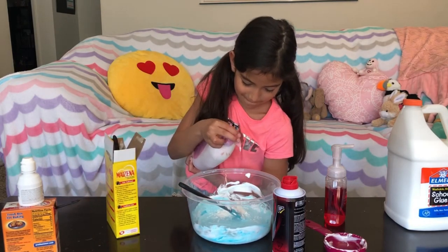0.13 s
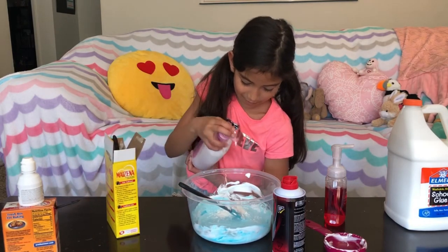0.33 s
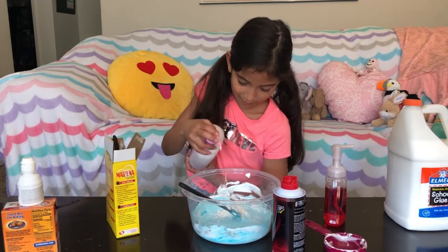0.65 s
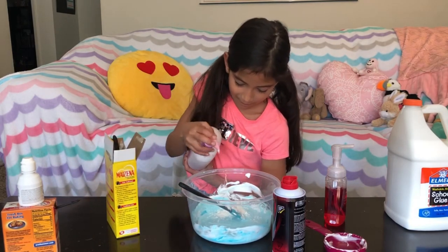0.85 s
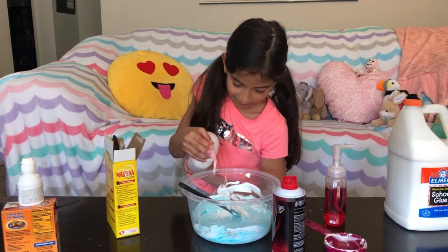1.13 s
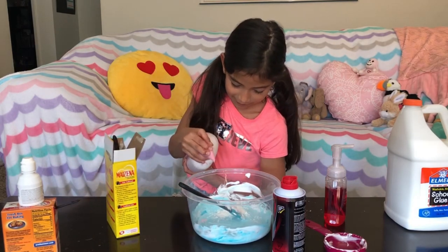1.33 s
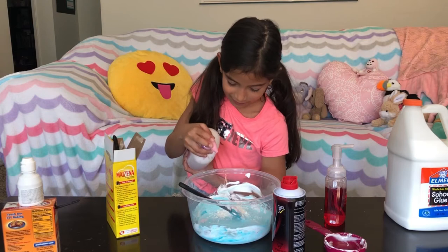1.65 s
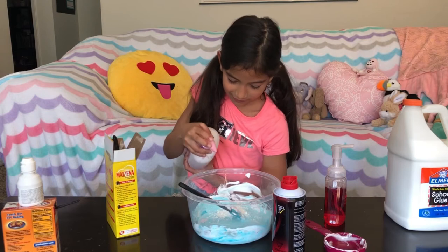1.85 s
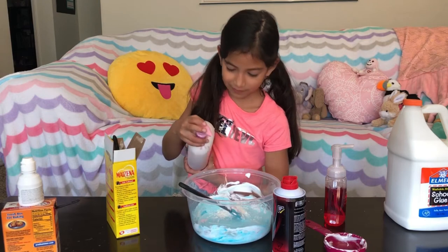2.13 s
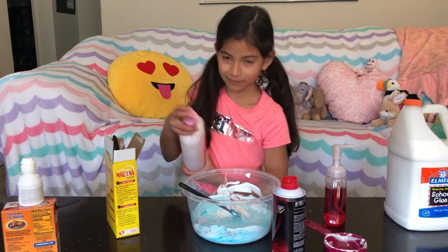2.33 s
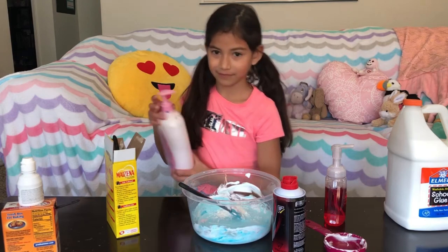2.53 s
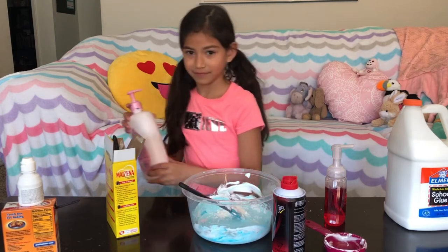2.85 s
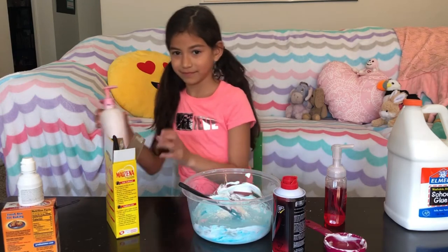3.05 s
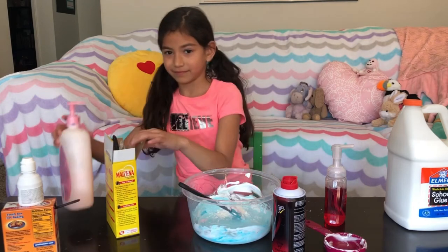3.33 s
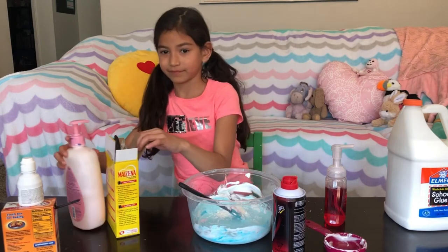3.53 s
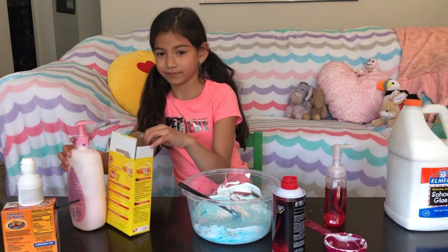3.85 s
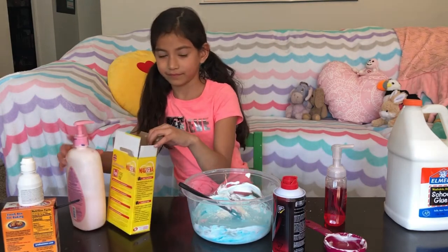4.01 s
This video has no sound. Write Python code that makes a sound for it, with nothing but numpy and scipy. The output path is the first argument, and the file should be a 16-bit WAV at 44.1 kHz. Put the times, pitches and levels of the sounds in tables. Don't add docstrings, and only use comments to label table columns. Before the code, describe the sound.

Fingers tick on a plastic pump bottle, its pump head snaps twice, then the bottle knocks down onto a wooden table and settles.

```python
import sys
import numpy as np
from scipy import signal
from scipy.fft import rfft, irfft, next_fast_len
from scipy.io import wavfile
from scipy.ndimage import uniform_filter1d, minimum_filter1d

SR = 44100
rng = np.random.default_rng(int(sys.argv[2]) if len(sys.argv) > 2 else 0)


def voltage_ratio(level):
    return 10 ** (np.asarray(level, float) / 20)


def bounce(signal):
    frames = np.transpose(np.atleast_2d(signal))
    limited = np.clip(frames, -1, 1)
    pcm = np.round(limited * 32767).astype(np.int16)
    wavfile.write(sys.argv[1], SR, pcm)


N = 184286


def rms_one(x):
    return x / np.sqrt(np.mean(x ** 2) + 1e-20)


def at_hz(points, hz, column=1):
    points = np.array(points)
    return np.interp(np.log(hz), np.log(points[:, 0]), points[:, column])


def in_time(rows, column):
    rows = np.array(rows)
    return np.interp(np.arange(N) / SR, rows[:, 0], rows[:, column])


def shaped(x, spectrum):
    hz = np.arange(len(x) // 2 + 1) * SR / len(x) + 1
    return irfft(rfft(x) * voltage_ratio(at_hz(spectrum, hz)), len(x))


def band(x, low_hz, high_hz):
    sos = signal.butter(2, [low_hz, min(high_hz, 0.45 * SR)], "band", fs=SR, output="sos")
    return signal.sosfilt(sos, x)


def above(x, hz):
    return signal.sosfilt(signal.butter(4, hz, "high", fs=SR, output="sos"), x)


def add(track, s, piece):
    i = round(s * SR)
    track[i:i + len(piece)] += piece[:N - i]


def push(ms):
    phase = np.clip(np.arange(0.5, 400) / (ms * SR / 1000), 0, 1)
    hump = np.sin(np.pi * phase) ** 2
    return hump / hump.sum()


def burst(ms):
    t_ms = np.arange(1500) / SR * 1000
    envelope = (1 - np.exp(-t_ms / 0.081)) * np.exp(-t_ms / max(ms, 0.2))
    return rng.standard_normal(len(t_ms)) * envelope


def ring(force, modes, flip=-1, blur=1):
    out = 0
    for k, (hz, level_db, t60) in enumerate(modes):
        r = voltage_ratio(-60 * blur / (t60 * SR))
        w = 2 * np.pi * hz / SR
        gain = flip ** k * voltage_ratio(level_db) * np.sin(w) * np.sqrt(blur)
        out = out + signal.lfilter([0, gain], [1, -2 * r * np.cos(w), r * r], force + 1e-18)
    return out


def all_directions(force, modes):
    unit = np.arange(2048) == 0
    power = sum(np.abs(rfft(ring(unit, [mode], blur=1.6))) ** 2 for mode in modes)
    response = np.roll(irfft(np.sqrt(power)), 1024)
    return signal.fftconvolve(force, response, "same")


def late_lows(x, ms):
    size = next_fast_len(N + SR // 4)
    hz = np.arange(size // 2 + 1) * SR / size
    turn = np.exp(-2j * np.pi * ms * np.log(1 + hz / 150))
    return irfft(rfft(x, size) * turn, size)[:N]


def snaps():
    # start in [s], peak in [dB].
    first_snap = [
        (1.1833, -18),
    ]
    second_snap = [
        (1.6633, -25),
        (1.6671, -18),
    ]
    # frequency in [Hz], level in [dB], T60 in [s].
    head_down = [(3000, -27, 0.0047), (4000, 7, 0.0018), (5240, 5, 0.0044), (5220, 11.5, 0.00088),
                 (7320, 8, 0.0026), (8700, -21, .003), (10100, -43, .003), (11400, 6.5, 0.0005),
                 (13060, -11, 0.0044), (14700, -2, 0.00089)]
    head_up = [(3620, 4.5, 0.0069), (4200, 1, 0.0066), (4960, 2, 0.0039), (5740, -7.5, 0.009),
               (7070, 0.5, 0.0068), (9250, -4, 0.0035), (10300, -2, 0.0031), (12300, -13, 0.0026),
               (13700, -12, 0.0023)]
    heard, all_round = 0, 0
    for hits, head, cut_hz in ((first_snap, head_down, 2800), (second_snap, head_up, 3400)):
        click, chatter = np.zeros(N), np.zeros(N)
        for s, db in hits:
            add(click, s, voltage_ratio(db + 3.5) * push(0.0385))
            add(chatter, s, voltage_ratio(db - 16.5) * burst(1.36))
        ringing = above(above(ring(click + chatter, head), cut_hz), cut_hz)
        heard = heard + ringing + voltage_ratio(5) * band(click, 1200, 3500)
        all_round = all_round + above(above(voltage_ratio(-3) * all_directions(click, head), cut_hz), cut_hz)
    return np.array([heard, all_round])


def knocks():
    # start in [s], push in [dB], crack in [dB], contact in [ms].
    contacts = [(3.5803, -20.5, -26.5, 1.05), (3.5835, -36, -55, 1.8), (3.5997, -38, -37.5, 0.79),
                (3.603, -49, -41, 1.6), (3.666, -62, -55, 2.9), (3.706, -38, -62, 1.6),
                (3.808, -41.5, -54.5, 2.18), (3.849, -40, -62, 3.4), (3.999, -48, -64.5, 2.05),
                (4.019, -43, -74, 5.8), (4.093, -42.5, -55, 1.43), (4.137, -31, -51, 2.03),
                (4.156, -32, -54, 4.1)]
    # frequency in [Hz], level in [dB], T60 in [s].
    table_modes = [(108.6, -5.5, 0.32), (157.5, -6.5, .25), (211, 2.5, 0.072), (261.5, -9.5, 0.13),
                   (284, -4.5, 0.22), (313.3, -2, 0.194), (373, -5.5, 0.14), (439, -7.5, 0.1),
                   (495, -2.5, 0.1), (538, -7, 0.05), (596.6, 4, 0.089), (647, 7.5, 0.046),
                   (733, -16, 0.48), (792, -3, 0.13), (878, -0.5, 0.16), (934, -6, 0.13), (1020, -10, 0.22),
                   (1130, 0, 0.18), (1243, 3, 0.14), (1920, -12, 0.13)]
    rim_modes = [(1670, 11, 0.0019), (2130, 12.5, 0.0028), (2880, 13.5, 0.0013), (4050, -53, 0.012),
                 (4900, -30, 0.0023), (7500, -47, 0.0029), (9600, -48, 0.0015)]
    force, cracks, clicks = np.zeros(N), np.zeros(N), np.zeros(N)
    for s, push_db, crack_db, ms in contacts:
        add(force, s, -voltage_ratio(push_db) * push(np.clip(ms, 0.2, 8)))
        add(cracks, s, voltage_ratio(crack_db - 9) * burst(4.1))
        add(clicks, s, voltage_ratio(crack_db + 4) * push(0.027))
    table = above(ring(late_lows(force, 1.208), table_modes, flip=0.94), 154)
    rim = np.array([ring(cracks, rim_modes), all_directions(clicks, rim_modes)])
    return table + band(rim, 450, 7400)


def ticks():
    # start in [s], peak in [dB], ring in [Hz], hollow thump in [dB].
    crisp_ticks = [
        (0.152, -33.5, 2920, -47),
        (1.1099, -47, 4400, -57),
        (1.634, -35, 4700, -43.5),
        (2.2954, -61.5, 3190, -72),
        (3.455, -59, 3200, -57),
        (3.483, -60, 4140, -57),
        (3.8888, -56, 2820, -59),
        (4.0804, -46.5, 2980, -51),
        (4.093, -51, 3800, -45.5),
    ]
    dull_ticks = [(0.2688, -64, 2620, -61), (0.407, -47.5, 2950, -85), (0.4528, -52, 3050, -56.5),
                  (0.5136, -55, 3850, -60.5), (0.818, -60.5, 2540, -79), (1.061, -37.5, 4120, -41),
                  (1.0882, -55, 3820, -68), (1.6289, -36.5, 4070, -44.5), (2.2122, -54.5, 4730, -78),
                  (2.8913, -53.5, 2960, -84), (2.93, -60, 4740, -62), (2.969, -52, 3800, -73),
                  (3.2343, -57, 3740, -64), (3.8298, -44.5, 2920, -50), (3.9096, -47, 2450, -71.5),
                  (3.915, -51.5, 2430, -58)]
    # start in [s], peak in [dB].
    thumb = [
        (0.408, -50),
        (0.972, -60.5),
        (1.166, -41),
        (1.172, -69),
        (1.184, -44.5),
        (1.668, -39),
    ]
    # frequency in [Hz], level in [dB], T60 in [s].
    bottle_modes = [(318, 1.5, 0.019), (409, 1, 0.031), (540, 2.5, 0.012), (760, -6, 0.029),
                    (918, -2, 0.026), (1233, 1.5, 0.014), (1507, 1.5, 0.01), (2195, -3, 0.021)]
    spout_modes = [(2480, -49, .04), (2610, -49, 0.04)]
    out, thumps, spout = np.zeros((2, N)), np.zeros(N), np.zeros(N)
    for rows, treble_db in ((crisp_ticks, 0.5), (dull_ticks, -23)):
        for s, db, hz, thump_db in rows:
            heard_force = 0.5 * burst(1) + 2.45 * np.pad(push(0.068), (0, 1100))
            all_round_force = 3.4 * push(0.065)
            for track, force in zip(out, (heard_force, all_round_force)):
                pitch = band(force, hz / 1.365, hz * 1.405)
                treble = voltage_ratio(treble_db - 9) * band(force, hz * 1.85, 12300)
                add(track, s + 0.00042, voltage_ratio(db + 16.5) * (pitch - treble))
            add(thumps, s, voltage_ratio(thump_db) * push(0.14))
    for s, db in thumb:
        add(thumps, s, voltage_ratio(db - 1) * push(0.39))
    add(spout, crisp_ticks[0][0] + 0.0027, burst(27) / 9)
    body = above(ring(late_lows(thumps, 1.48), bottle_modes), 240)
    return out + body + ring(spout, spout_modes) * [[1], [0.3]]


def rubbing():
    # start in [s], length in [s], level at start in [dB], level at end in [dB], centre at end in [Hz].
    strokes = [(0.106, 0.092, -67.5, -71, 4900), (0.431, .04, -61.5, -70, 4360),
               (0.75, 0.056, -70.5, -66, 4260), (0.99, .03, -70, -79, 4500), (1.078, 0.026, -80, -75, 5500),
               (2.478, 0.22, -61.5, -57.5, 6900), (2.905, 0.068, -63, -62, 4530),
               (3.217, 0.013, -69.5, -66.5, 4000), (3.365, .13, -75, -72, 4470),
               (3.791, 0.11, -59.5, -65.5, 4000), (4.102, 0.024, -64, -73, 4370),
               (4.144, 0.033, -71, -57, 1700)]
    start_hz, rise_db_per_s, fall_db_per_s = 4700, 178, 214
    t, level, centre = np.arange(N) / SR, np.full(N, 1e-9), np.zeros(N)
    for s, length, start_db, end_db, end_hz in strokes:
        along = np.clip((t - s) / max(length, 0.005), 0, 1)
        edges_db = rise_db_per_s * np.maximum(s - t, 0) + fall_db_per_s * np.maximum(t - s - length, 0)
        stroke = voltage_ratio(start_db + (end_db - start_db) * along - edges_db)
        level = level + stroke
        centre = centre + stroke * (start_hz + (end_hz - start_hz) * along)
    centre = (centre + 1e-9 * start_hz) / level
    out, edges = 0, np.geomspace(620, 15500, 12)
    for low, high in zip(edges, edges[1:]):
        patches = rms_one(band(rng.standard_normal(N), 0.67, 23))
        grains = rng.standard_normal(N) * voltage_ratio(2 * rng.exponential(1, N) + 1.8 * patches)
        octaves_off = np.log2(np.sqrt(low * high) / centre)
        colour_db = -4.5 * octaves_off ** 2 - 7.1 * (low / 11000) ** 2
        out = out + voltage_ratio(colour_db) * band(grains, low, high)
    return level * out / np.sqrt(uniform_filter1d(out ** 2, 4000))


def stirring():
    # time in [s], level in [dB].
    bumps = [
        (0.0, -61),
        (0.85, -59),
        (1.13, -58.5),
        (1.29, -62.5),
        (2.06, -64.5),
        (2.16, -62.5),
        (3.42, -60.5),
        (3.56, -57.5),
    ]
    lumps = rms_one(band(rng.standard_normal(N), 1, 28))
    rumble = rms_one(band(rng.standard_normal(N), 100, 468))
    return voltage_ratio(in_time(bumps, column=1) - 4.5 + 3.2 * lumps) * rumble


def house_air():
    # frequency in [Hz], level in [dB].
    air_spectrum = [(13, -67), (22, -13.5), (76, 1), (179, -6.5), (223, -1.5), (263, -5), (409, -14.5),
                    (554, -24), (602, -12.5), (815, -13), (935, -15.5), (1020, -13.5), (3320, -20),
                    (4890, -19.5), (16000, -29)]
    return voltage_ratio(-58.5 - 5) * rms_one(shaped(rng.standard_normal(N), air_spectrum))


def echoes(x):
    # delay in [ms], level in [dB], smear in [ms].
    surfaces = [
        (1.45, -8, .3),
        (7.7, -18, .7),
        (12.6, -14, .6),
    ]
    response = np.zeros(SR // 10)
    for ms, db, smear_ms in surfaces:
        scatter = burst(smear_ms)
        add(response, ms / 1000, voltage_ratio(db) * scatter / np.linalg.norm(scatter))
    return signal.fftconvolve(x, response)[:N]


def room(x):
    # frequency in [Hz], T60 in [s], level in [dB].
    tail_bands = [(150, 0.4, -18.5), (500, 0.31, -14), (1510, 0.4, -14.5), (3360, 0.42, -22),
                  (6130, 0.26, -18), (8900, 0.3, -16), (12200, 0.26, -24.5), (15070, 0.11, -8.5)]
    build_up_s = 0.013
    t = np.arange(int(0.7 * SR)) / SR
    response, edges = np.zeros(len(t)), np.geomspace(80, 17000, 17)
    for low, high in zip(edges, edges[1:]):
        hz = np.sqrt(low * high)
        decay = voltage_ratio(at_hz(tail_bands, hz, column=2) - 60 * t / at_hz(tail_bands, hz))
        response += decay * band(rng.standard_normal(len(t)), low, high)
    return signal.fftconvolve(x, voltage_ratio(-18) * response * np.clip(t / build_up_s, 0, 1))[:N]


def scene():
    heard, all_round = snaps() + knocks() + ticks()
    hits = heard + echoes(heard) + room(all_round)
    return (hits + rubbing() + stirring() + house_air())[None]


def hush_before_attacks(x):
    above_hz, ahead_s, gap_db = 4000, 0.019, 36
    treble = signal.sosfiltfilt(signal.butter(4, above_hz, "high", fs=SR, output="sos"), x)
    power = uniform_filter1d(treble ** 2, size=88)
    ahead = round(ahead_s * SR)
    coming = -minimum_filter1d(-power, size=ahead, origin=-(ahead // 2))
    masked = 1.0 * (power < coming * voltage_ratio(-2 * gap_db))
    return x - treble * uniform_filter1d(masked, size=44)


def band_limit(x):
    return signal.sosfilt(signal.butter(12, 17040, fs=SR, output="sos"), x)


def record(dry):
    top_cut = signal.cheby2(10, 60, 17000, fs=SR, output="sos")
    mix = signal.sosfilt(top_cut, hush_before_attacks(dry))
    return band_limit(mix)


dry = scene()
out = record(dry)
bounce(out)
```